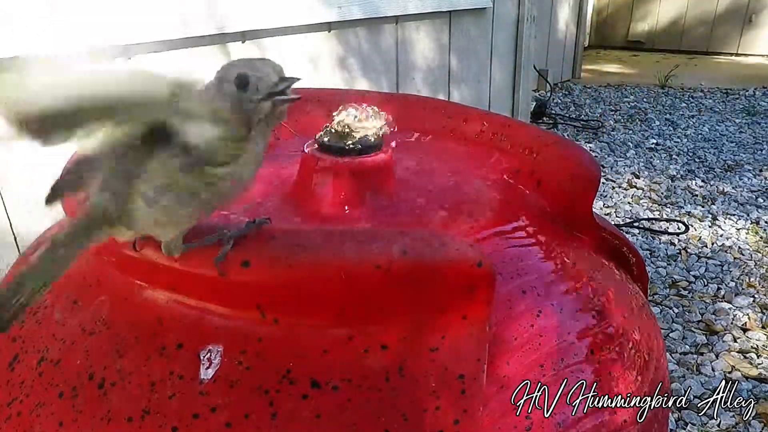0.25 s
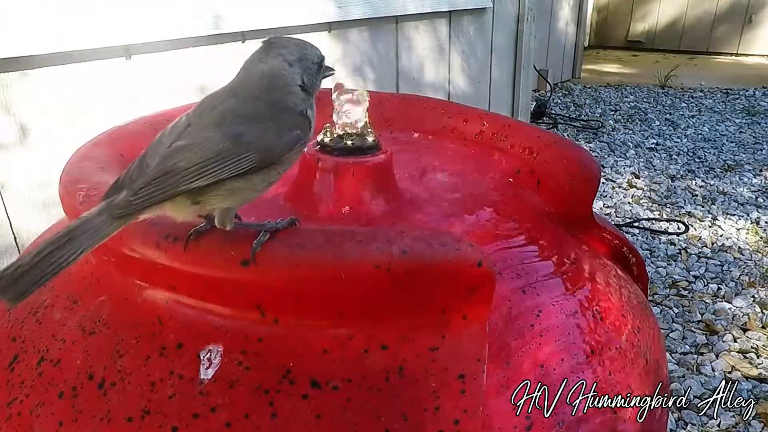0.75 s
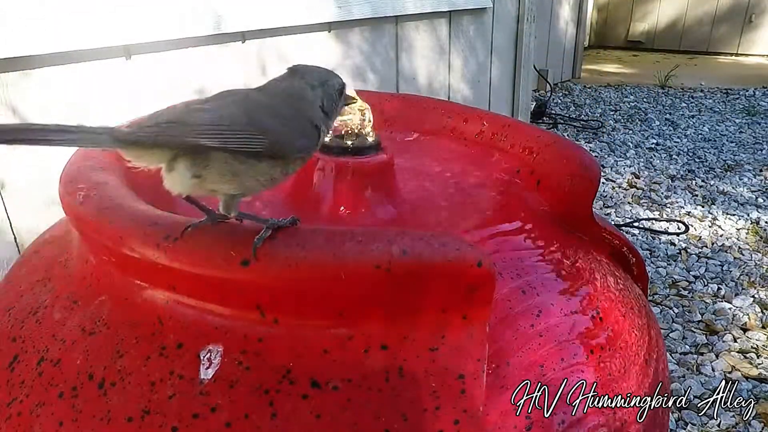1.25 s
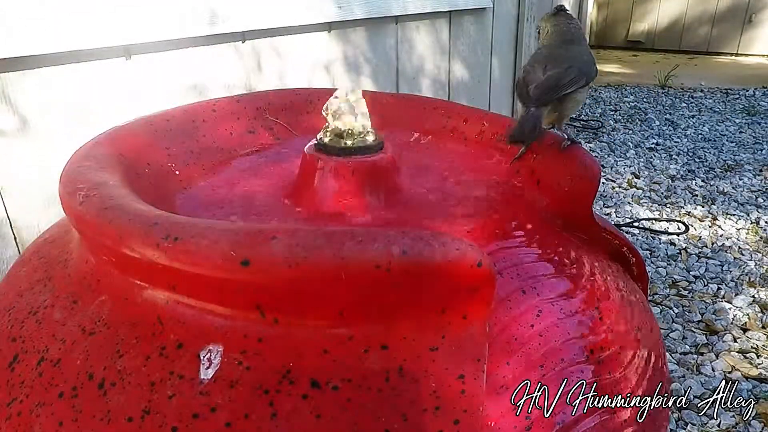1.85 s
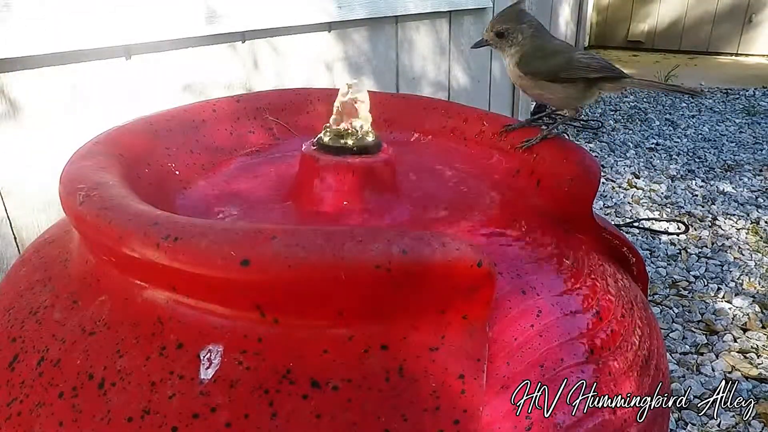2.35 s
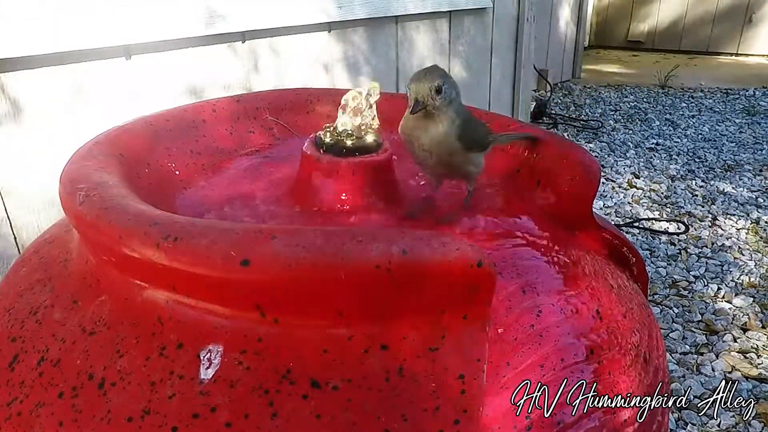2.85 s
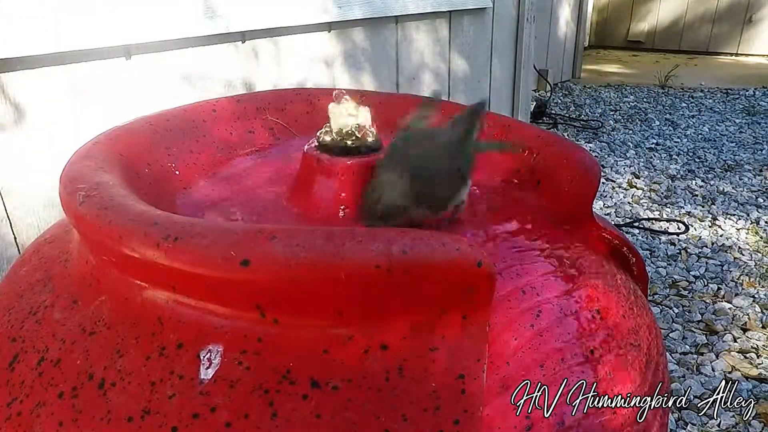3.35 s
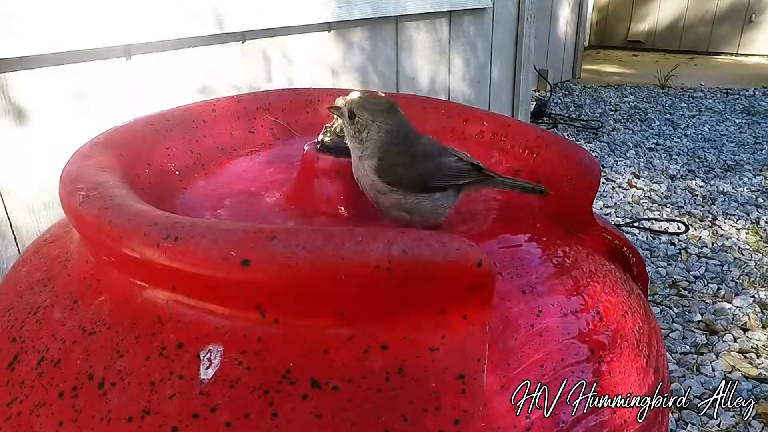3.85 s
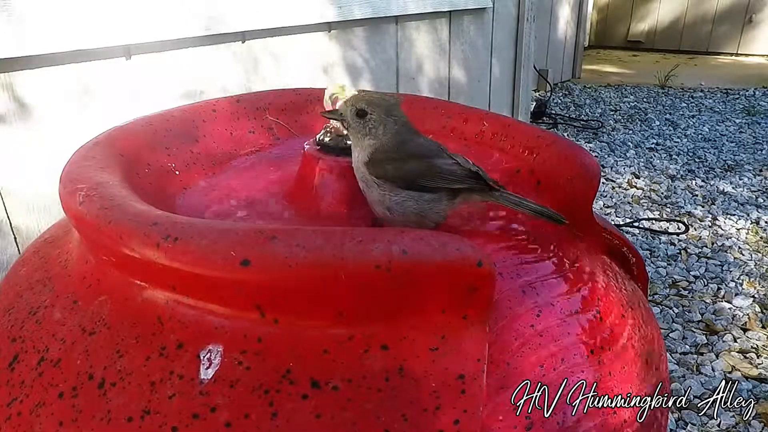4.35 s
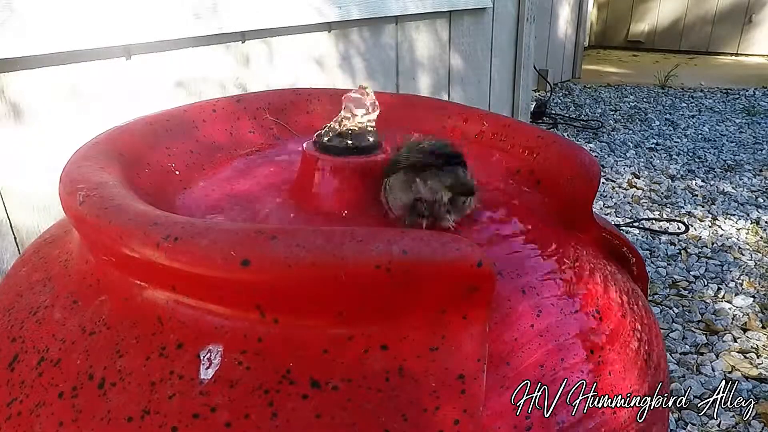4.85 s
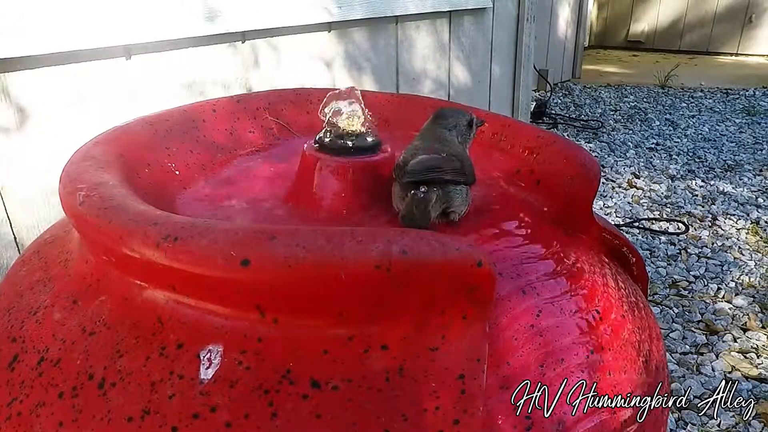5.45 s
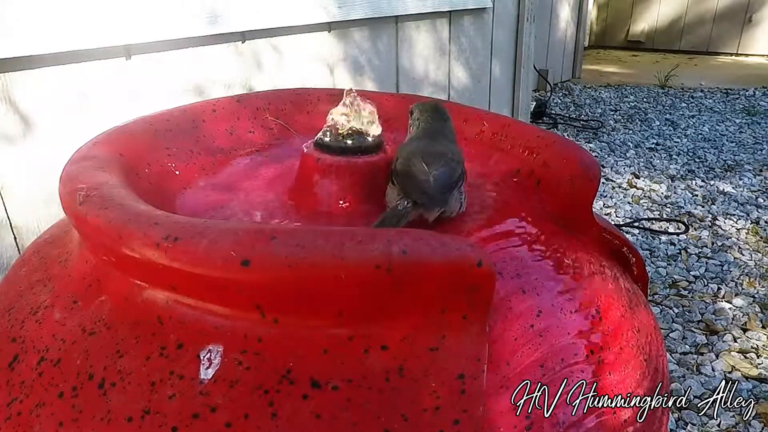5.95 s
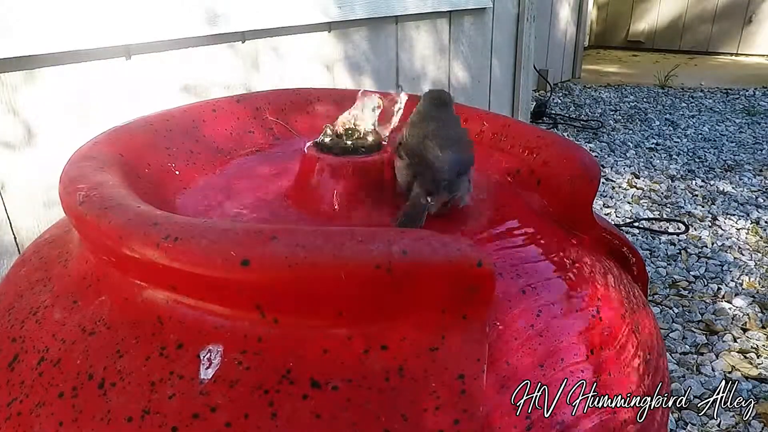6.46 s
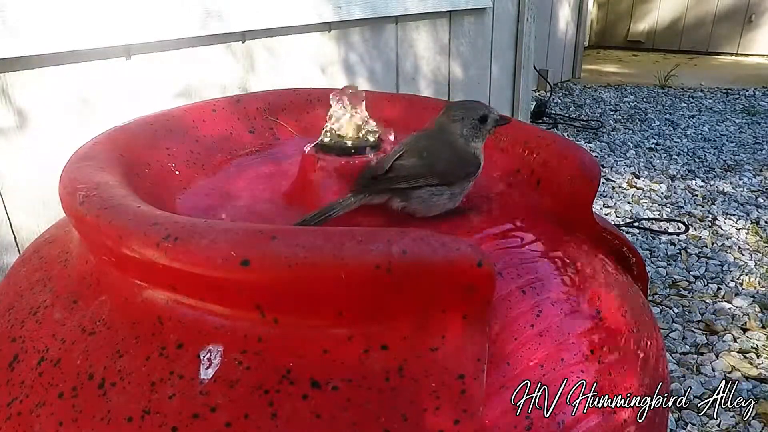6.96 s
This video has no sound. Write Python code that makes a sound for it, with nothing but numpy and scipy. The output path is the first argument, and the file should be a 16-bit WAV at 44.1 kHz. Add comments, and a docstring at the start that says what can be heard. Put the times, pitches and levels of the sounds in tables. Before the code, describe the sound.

A small pot fountain plinks and trickles close by while a little bird flutters with deep, buffeting wing thumps, taps the pot and chirps once.

```python
"""Pot fountain with small birds

Water plinks, spatters and gurgles in a basin, made of damped rings that climb in pitch and noise cracks.
Blows ring the modes of a hollow pot; close wings and wind are low turbulence and swings at the microphone.
One bird chirps with two mixing whistles, and another gives a harsh call of pulsed noise through throat resonances.
Behind them lie the hum of the pump in sine harmonics, a wash of water, the still yard and faint falling tones.
"""
import sys
import numpy as np
from scipy import signal
from scipy.fft import rfft, irfft
from scipy.io import wavfile
from scipy.ndimage import uniform_filter1d

SR = 44100
rng = np.random.default_rng(int(sys.argv[2]) if len(sys.argv) > 2 else 0)


def transcribe(signal):
    """Save signal, clipped to [-1, 1], as a 16-bit WAV file at the path in sys.argv[1]."""
    frames = np.atleast_2d(signal).T
    limited = np.clip(frames, -1, 1)
    pcm = np.round(limited * 32767).astype(np.int16)
    wavfile.write(sys.argv[1], SR, pcm)


N = 317961
T = np.arange(N) / SR

# The clearest short rings: bubbles in the basin, and the ping of the tap at 3.80 s.
# Each row: start in seconds, peak in dB, pitch in Hz, cycles until the ring is 60 dB down.
CLEAR_RINGS = [(.035, -37, 4200, 20), (.777, -44, 4000, 13), (0.7996, -43, 1950, 18),
               (.881, -37.5, 5340, 12), (1.0843, -30.5, 4260, 29), (1.113, -42, 4250, 18),
               (1.288, -46, 4500, 31), (1.286, -48, 7350, 25), (1.4364, -44.5, 2450, 29),
               (1.45, -45, 3900, 13), (1.5199, -41, 810, 16), (1.621, -51.5, 1960, 81),
               (1.7952, -48, 1177, 66), (1.7977, -40.5, 2680, 32), (1.899, -46, 2330, 49),
               (1.935, -42.5, 1067, 39), (1.94, -42, 3670, 28), (1.955, -47, 3460, 28),
               (1.974, -48, 4300, 23), (2.101, -55, 1400, 65), (2.248, -54, 2120, 49),
               (2.272, -53, 2750, 30), (2.253, -46, 2880, 33), (2.341, -50, 1060, 100),
               (2.3428, -41.5, 5600, 33), (2.471, -58, 1460, 70), (2.473, -54, 2750, 40),
               (2.601, -46.5, 3300, 56), (2.607, -46, 3740, 24), (2.626, -56, 1610, 55),
               (2.724, -43, 1990, 43), (2.731, -55, 2370, 70), (2.7527, -32, 3300, 18),
               (2.754, -50, 1670, 30), (2.848, -41, 6700, 21), (2.8632, -30, 3620, 23),
               (2.88, -49, 4300, 26), (3.0178, -42, 3400, 15), (3.039, -39, 4100, 18),
               (3.086, -44, 3900, 24), (3.1713, -30, 6000, 35), (3.175, -34, 3660, 31),
               (3.176, -47.5, 1640, 37), (3.249, -45, 7860, 34), (3.285, -43, 3730, 29),
               (3.2845, -46, 8000, 31), (3.328, -48, 2750, 26), (3.376, -46, 3600, 26),
               (3.344, -43, 2600, 21), (3.346, -45, 4420, 26), (3.3728, -38.5, 2950, 18),
               (3.393, -37.5, 2780, 24), (3.6314, -44, 5900, 40), (3.736, -48.5, 3200, 40),
               (3.801, -25, 2440, 23), (4.0042, -42.5, 1280, 35), (4.026, -35, 6530, 39),
               (4.035, -43, 6860, 34), (4.072, -54, 1820, 45), (4.1195, -47.5, 6300, 48),
               (4.191, -45, 1290, 56), (4.386, -58, 2950, 50), (4.475, -57, 2540, 55),
               (4.503, -52.5, 1220, 110), (4.5247, -44, 6000, 36), (4.529, -42.5, 2280, 38),
               (4.5536, -41, 7400, 34), (4.58, -48, 3200, 16), (4.631, -37, 4600, 27),
               (4.953, -51, 2220, 60), (5.032, -41.5, 2930, 32), (5.0646, -34, 3420, 14),
               (5.066, -48, 3330, 70), (5.179, -45, 4350, 28), (5.1855, -45, 2360, 40),
               (5.2378, -42.5, 4970, 32), (5.3012, -44, 2200, 26), (5.3084, -27.5, 2100, 18),
               (5.315, -44, 2140, 60), (5.353, -43, 2850, 43), (5.696, -51, 2300, 45),
               (5.779, -47.5, 4100, 50), (5.9085, -45, 3120, 26), (6.424, -37, 3370, 17),
               (6.4352, -30.5, 2700, 13), (6.439, -42, 2610, 60), (6.4884, -43.5, 3080, 27),
               (6.5299, -27.5, 2660, 17), (6.533, -37, 2470, 36), (6.537, -40, 3800, 28),
               (6.548, -37, 3500, 25), (6.549, -40, 4700, 39), (6.572, -36.5, 4360, 45),
               (6.599, -44, 5370, 26), (6.6424, -43.5, 4600, 32), (6.769, -46, 4200, 33),
               (6.957, -48.5, 2680, 58), (7.077, -44, 4030, 45), (7.0825, -42.5, 5800, 27)]
# Splashes in the shallow basin. Each row: start in seconds, length in seconds,
# greatest droplet peak in dB, centre of the droplet pitches in Hz.
BASIN_SPLASHES = [(1.56, 0.013, -41.5, 3080), (1.934, 0.01, -37, 6100), (2.286, 0.014, -47, 3750),
                  (3.146, 0.027, -49, 2860), (4.853, 0.003, -37, 2980), (6.503, 0.016, -44, 5060),
                  (6.526, 0.017, -43, 3260), (6.548, 0.012, -52, 4540), (6.57, 0.012, -52, 5060),
                  (6.738, 0.0086, -49, 3540)]
# The loudest drops that slap the wet glaze. Each row: start in seconds, peak in dB, centre of the colour in Hz.
GLAZE_SLAPS = [(.377, -35, 8000), (0.416, -49, 5500), (.421, -51, 4500), (.586, -45, 10000),
               (1.565, -34, 8850), (1.895, -35, 7650), (1.939, -42, 9900), (2.142, -39, 2430),
               (2.291, -41.5, 12000), (2.813, -41, 10000), (3.072, -30.5, 10900), (3.148, -33.5, 6240),
               (3.158, -43, 6500), (3.326, -41, 9900), (3.709, -48, 6000), (4.235, -37.5, 6400),
               (4.513, -36.5, 11000), (4.8546, -48, 3970), (4.999, -44, 4970), (5.811, -38, 5400),
               (6.507, -46, 4800), (6.521, -46, 11000), (6.56, -41, 12000), (6.57, -35, 12100),
               (6.581, -39, 11500), (6.588, -45, 14000), (6.956, -41, 11360)]
# Beak and claws on the pot. Each row: start in seconds, peak in dB, contact cutoff in Hz,
# ring favoured by the place struck in Hz, weight of the deep modes in dB.
POT_BLOWS = [(1.5635, -44, 2000, 630, -9), (3.147, -43, 1800, 650, -1), (3.393, -25.5, 1400, 966, 6.5),
             (3.8007, -24, 4860, 1044, -11), (4.003, -42, 3130, 1440, -4), (4.188, -51, 2000, 2000, -4),
             (4.912, -38.5, 474, 380, 2), (5.6252, -24.5, 1980, 1490, 2), (6.88, -44, 580, 556, 2),
             (7.03, -36.5, 734, 656, 15), (7.069, -42.5, 695, 566, -1)]
# Modes of the pot. Each row: frequency in Hz, relative level in dB, time to fall 60 dB in seconds.
POT_MODES = [(140, -10.5, 0.15), (324, 0, 0.038), (402, -0.5, 0.03), (562, -1, 0.029), (640, -1, 0.07),
             (756, 3.5, 0.027), (902, 0.5, 0.042), (974, -12, .15), (1042, -9.5, 0.092), (1217, 6.5, 0.027),
             (1468, -12, 0.089), (1518, -11.5, .125), (1650, 4.5, 0.016), (1990, -6.5, 0.039),
             (2270, -13, .09), (2530, 7, 0.0049), (3400, 9.5, 0.012), (4760, 18.5, 0.0035)]
# Bursts of wingbeats. Each row: start in seconds, end in seconds, beats per second,
# feather swish in dB, reference level of the pushed air in dB.
WINGBEAT_BURSTS = [(-.02, 0.27, 26.5, -47, -20), (0.273, 0.482, 23.3, -48.5, -18.5),
                   (0.419, 0.599, 25.4, -48, -31.5), (0.664, 0.792, 24.4, -52, -28),
                   (0.852, 0.935, 25.6, -52, -26.5), (6.264, 6.481, 28.2, -49, -28),
                   (6.489, 6.651, 25.3, -48, -28), (6.684, 6.772, 31.6, -45, -34),
                   (6.828, 6.93, 26.8, -54, -32), (6.994, 7.095, 25.3, -51.5, -35)]
# Short feathery bursts of noise: hard wing strokes, and one splash near 6.51 s.
# Each row: peak time in seconds, half length in seconds, feathery noise in dB, low puff in dB.
FEATHERY_BURSTS = [(0.061, 0.0049, -58, -40), (0.103, 0.0066, -50, -48), (0.14, 0.0098, -70, -36.5),
                   (0.149, 0.0021, -58, -44), (0.173, 0.0065, -69, -40.5), (0.207, 0.0098, -59, -58),
                   (.24, 0.012, -51, -61), (0.286, 0.0053, -49, -50), (0.31, 0.013, -49.5, -39),
                   (0.324, .003, -53, -22), (0.335, 0.0061, -47, -10.5), (0.348, 0.0067, -46, -9.5),
                   (0.378, 0.015, -49, -23), (0.417, 0.0072, -43.5, -35), (0.456, 0.0055, -55, -29),
                   (0.495, 0.0043, -66, -31), (0.534, 0.0057, -49, -35), (0.57, 0.0061, -67, -42),
                   (0.721, 0.0095, -58, -40.5), (0.887, 0.0092, -55.5, -43), (0.971, 0.0067, -48, -46),
                   (6.278, 0.0035, -53, -52), (6.31, 0.014, -53, -44), (6.345, 0.0075, -53.5, -41),
                   (6.511, 0.0059, -52.5, -62), (6.564, 0.0067, -50, -38), (6.602, 0.0065, -51.5, -41.5),
                   (6.741, 0.0023, -44, -41), (6.88, 0.007, -57, -38.5), (7.07, 0.0039, -52, -40.5)]
# Spectra of noise: feather swish, feathery bursts, wing wake, turbulent air, wash of water.
# Each row: frequency in Hz, relative level in dB.
SWISH_SPECTRUM = [(100, 32.5), (300, 9.5), (600, 8), (1200, 4.5), (2500, 2), (5000, -4), (8000, -11),
                  (15000, -12.5)]
BURST_SPECTRUM = [(400, 16), (1200, 8), (2500, 1.5), (5000, 0), (8000, -6), (15000, -9)]
WAKE_SPECTRUM = [(70, 0.5), (120, 8), (230, 2.5), (310, 1), (460, -12), (650, -12.5), (1300, -40.5),
                 (2300, -88)]
AIR_SPECTRUM = [(15, -8), (29, 4), (50, -2), (75, -8.5), (105, -15), (200, -34), (400, -57), (900, -70)]
WASH_SPECTRUM = [(300, 7.5), (900, -0.5), (2500, -7), (4800, -7.5), (8000, -15), (15000, -17)]
# A chirp from both sides of the syrinx. Each row: time in seconds, low voice in Hz, high voice in Hz,
# low voice in dB, high voice in dB.
CHIRP_COURSE = [(6.362, 4800, 6400, -75, -90), (6.371, 4540, 6020, -45.5, -43.5),
                (6.382, 4450, 5820, -44, -47), (6.388, 4480, 5700, -73, -72), (6.394, 4500, 5650, -46, -65),
                (6.412, 4340, 5700, -49, -52), (6.428, 4250, 5350, -47, -54), (6.444, 4100, 5040, -48, -52),
                (6.452, 4050, 4900, -82, -91)]
# Overtones of the chirp. Each row: multiple of the low voice, multiple of the high voice.
CHIRP_OVERTONES = [(2, 0), (-1, 2), (1, 1), (0, 2), (3, 0)]
# Level of each overtone in dB against the low voice.
CHIRP_OVERTONE_DB = [-24, -30, -27, -30, -28]
# Course of the harsh call. Each row: time in seconds, level in dB.
RASP_COURSE = [(.99, -85), (.999, -49), (1.014, -59), (1.037, -54.5), (1.047, -61), (1.075, -68),
               (1.105, -60.5), (1.15, -67), (1.165, -59), (1.205, -85), (1.235, -68), (1.26, -57.5),
               (1.3, -77)]
# Throat resonances of that call. Each row: frequency in Hz, width in Hz, relative level in dB.
THROAT_RESONANCES = [(1540, 370, 2), (2450, 400, 0), (3700, 440, -12)]
# Thumps of moving air on the microphone, from close wings or wind. Each row: peak time in seconds,
# half length in seconds, reference level in dB.
AIR_THUMPS = [(0.13, 0.02, -16), (0.347, 0.042, -6), (0.685, 0.016, -24), (0.75, 0.017, -25),
              (0.879, 0.016, -21.5), (0.981, 0.017, -16.5), (1.053, 0.024, -27), (1.216, 0.09, -30.5),
              (1.606, 0.039, -37.5), (2.737, 0.33, -41), (3.409, 0.059, -27.5), (3.578, 0.067, -39.5),
              (3.77, 0.047, -39), (4.378, 0.047, -35), (4.47, 0.027, -26), (4.75, 0.04, -31),
              (5.007, 0.042, -30), (5.3, 0.15, -39), (5.507, 0.032, -34), (5.741, 0.026, -33),
              (5.932, 0.061, -33), (6.06, 0.052, -29.5), (6.29, 0.014, -26.5), (6.326, 0.048, -21),
              (6.75, 0.03, -25)]
# Faint thin tones. Each row: middle in seconds, half length in seconds, pitch at the middle in Hz,
# glide in Hz per second, rms at the middle in dB.
THIN_TONES = [(4.641, 0.078, 534, -650, -64), (5.563, 0.032, 600, -250, -62.5),
              (5.742, .1, 928, -180, -69.5)]
# Hum of the pump. Each row: frequency in Hz, mean rms in dB.
PUMP_HARMONICS = [(120, -59), (240, -68.5), (360, -73.5)]
# Spectrum of the still yard. Each row: frequency in Hz, relative level in dB per Hz.
YARD_SPECTRUM = [(40, 30), (90, 17.5), (150, 24), (220, 20.5), (340, 19), (520, 11), (800, 7), (1400, -0.5),
                 (3000, -5), (6000, -8), (10000, -13.5), (15500, -24)]


def undb(db):
    """Decibels are a logarithmic measure: convert them to amplitude gain."""
    return 10 ** (np.asarray(db) / 20)


def unit(x):
    """Normalise the power: scale to rms 1."""
    return x / np.sqrt(np.mean(x ** 2))


def curves(table):
    """Linear interpolation: join each column of a table by straight lines in time."""
    s, *columns = np.transpose(table)
    return [np.interp(T, s, c) for c in columns]


def noise(spectrum):
    """Spectral shaping: weight white noise by (Hz, dB) points and scale it to rms 1."""
    hz, db = np.transpose(spectrum)
    f = np.maximum(np.fft.rfftfreq(N, 1 / SR), 1)
    gain = undb(np.interp(np.log(f), np.log(hz), db))
    # beyond the outer points the level falls by 12 dB per octave
    gain = gain * np.minimum(f / hz[0], 1) ** 2 * np.minimum(hz[-1] / f, 1) ** 2
    return unit(irfft(rfft(rng.standard_normal(N)) * gain, N))


def band(x, hz, width):
    """Simple resonance: a second-order peak with gain 1 at its centre."""
    centre_hz = min(hz, SR / 2 - 2000)
    b, a = signal.iirpeak(centre_hz, hz / min(width, SR / 3), fs=SR)
    return signal.lfilter(b, a, x)


def walk(rate):
    """Slow random fluctuation: smoothed random steps, scaled to rms 1."""
    k = max(int(SR / rate), 1)
    steps = np.repeat(rng.standard_normal(N // k + 1), k)[:N]
    return unit(uniform_filter1d(steps, k))


def swell(s, length):
    """Gaussian envelope: a bell-shaped rise and fall about time s."""
    return np.exp(-np.minimum(((T - s) / length) ** 2, 20))


def add(out, s, sound):
    """Superposition: mix a sound in at time s."""
    i = int(np.clip(s * SR, 0, N - 1))
    out[i:i + len(sound)] += sound[:N - i]


def bubble(hz, t60, rise_per_cycle=0.0076, birth_share=0.0097):
    """Damped bubble oscillation: it rings once and climbs in pitch as it nears the surface."""
    t = T[:SR // 10]
    cycles = hz * t
    birth = 1 - np.exp(-t / (birth_share * t60))
    phase = 2 * np.pi * (cycles + rise_per_cycle * cycles ** 2 / 2)
    ring = np.gradient(np.sin(phase) * undb(-60 * t / t60) * birth)
    return ring / np.abs(ring).max()


def plinks(after_db=-17, after_t60=0.0053, tick_db=-15, tick_t60=0.011,
           lead_s=0.001203, rise=.006, rise_slope=0.34):
    """Impact and damped ringing: a tick, a clear ring (a bubble, or once the pot tap's ping), a weaker ring."""
    out, t = np.zeros(N), T[:SR // 50]
    chances = rng.random((len(CLEAR_RINGS), 2))
    for (s, db, hz, cycles), (lag, size) in zip(CLEAR_RINGS, chances):
        grit = rng.standard_normal(len(t)) * undb(-60 * t / tick_t60)
        tick = band(grit, 1.4 * hz, 1.4 * hz)
        add(out, s - lead_s, undb(db + tick_db) * tick / np.abs(tick).max())
        # the louder the ring, the steadier its pitch
        rise_per_cycle = rise * undb(-rise_slope * (db + 46))
        add(out, s, undb(db) * bubble(hz, cycles / hz, rise_per_cycle))
        after = bubble(hz * (0.86 + 0.19 * size), after_t60)
        add(out, s + 0.002 + 0.0065 * lag, undb(db + after_db) * after)
    return out


def burble(count=70, db=-51, spread_db=7, low_hz=2400, high_hz=8500, cycles=20):
    """Repeated bubble resonance: softer, short bubbles keep surfacing, about ten each second."""
    out = np.zeros(N)
    for k, (when, pitch, depth) in enumerate(rng.random((count, 3))):
        hz = low_hz * (high_hz / low_hz) ** pitch
        start = (k + when) / count * N / SR
        add(out, start, undb(db - spread_db * depth) * bubble(hz, cycles / hz))
    return out


def trickle(count=800, db=-63, spread_db=3.5, low_hz=2000, high_hz=12000, cycles=26):
    """Random superposition: many tiny bubbles where the jet falls back, few of them loud."""
    out = np.zeros(N)
    for when, pitch, size, life in rng.random((count, 4)):
        hz = low_hz * (high_hz / low_hz) ** pitch
        level_db = db - spread_db * np.log(size + 0.017)
        add(out, when * N / SR, undb(level_db) * bubble(hz, cycles * (.5 + life) / hz))
    return out


def splashes(count=8, octaves=1.71, cycles=17, spread_db=6):
    """Break-up into droplets: a splash throws a handful, each with a brief ring of its own."""
    out = np.zeros(N)
    chances = rng.random((len(BASIN_SPLASHES), count, 3))
    for (s, length, db, centre), droplets in zip(BASIN_SPLASHES, chances):
        for when, pitch, size in droplets:
            hz = centre * 2 ** (octaves * (pitch - .5))
            add(out, s + length * when, undb(db - spread_db * size) * bubble(hz, cycles / hz))
    return out


def spats(t60=0.0034, spray_db=-21, spray_t60=0.021):
    """Impact noise: a drop slaps the glaze with a sharp crack and a little longer-lasting spray."""
    out, t = np.zeros(N), T[:SR // 25]
    decay = undb(-60 * t / t60) + undb(spray_db - 60 * t / spray_t60)
    for s, db, hz in GLAZE_SLAPS:
        crack = band(rng.standard_normal(len(t)) * decay, hz, 0.8 * hz)
        add(out, s, undb(db) * crack / np.abs(crack).max())
    return out


def gurgle(count=60, db=-60, spread_db=8, low_hz=300, high_hz=1000, cycles=36):
    """Size and pitch: large, slow bubbles glug faintly at low pitch where the water drains."""
    out = np.zeros(N)
    for when, pitch, depth in rng.random((count, 3)):
        hz = low_hz * (high_hz / low_hz) ** pitch
        add(out, when * N / SR, undb(db - spread_db * depth) * bubble(hz, cycles / hz, 0.0038))
    return out


def hollow_boom(hz=141.2, width_hz=20.4, db=-60):
    """Cavity resonance: the air in the pot booms softly, as noise through two equal resonances."""
    once = band(rng.standard_normal(N), hz, width_hz)
    return undb(db) * unit(band(once, hz, width_hz))


def taps(rattle_db=-8, rattle_t60=0.029, favour_db=9, favour_width_hz=40, deep_hz=600):
    """Modal excitation: the place struck weights the pot's modes, and a soft contact dulls the high ones."""
    out, t = np.zeros(N), T[:SR // 5]
    # neighbouring modes of the wall push the air in opposite directions
    modes = np.array([(-1) ** k * undb(db - 60 * t / t60) * np.sin(2 * np.pi * hz * t)
                      for k, (hz, db, t60) in enumerate(POT_MODES)])
    mode_hz = np.array(POT_MODES)[:, 0]
    for s, db, contact_hz, favoured_hz, deep_db in POT_BLOWS:
        favour = np.exp(-((mode_hz - favoured_hz) / favour_width_hz) ** 2)
        mix_db = favour_db * favour + deep_db * (mode_hz < deep_hz)
        rattle = rng.standard_normal(len(t)) * undb(rattle_db - 60 * t / rattle_t60)
        contact = signal.butter(3, contact_hz, fs=SR, output="sos")
        blow = signal.sosfilt(contact, undb(mix_db) @ modes + rattle)
        add(out, s, undb(db) * blow / np.abs(blow).max())
    return out


def eddies():
    """Turbulent pressure: low noise at the microphone, evened out in strength."""
    air = noise(AIR_SPECTRUM)
    return air / np.sqrt(uniform_filter1d(air ** 2, SR // 16))


def wings(beat_db=-2, eddy_db=-5, swish_depth=0.33, wake_db=-21, sharpness=3, surge_db=2.0, linger_s=0.019):
    """Periodic forcing: each beat pushes air, swishes feathers and sheds a puff; stirred air settles slowly."""
    push, swish, stir, wake = np.zeros((4, N))
    for start, end, rate, feather_db, air_db in WINGBEAT_BURSTS:
        progress = np.clip((T - start) / (end - start), 0, 1)
        # some beats are harder than others
        window = undb(surge_db * walk(rate)) * np.sqrt(np.sin(np.pi * progress).clip(0))
        turn = 2 * np.pi * rate * (T - start) + 0.92 * walk(25)
        air = window * undb(air_db)
        push += air * (np.sin(turn) + 0.46 * np.sin(2 * turn))
        stir += air
        wake += air * np.exp(sharpness * (np.cos(turn) - 1))
        swish += window * undb(feather_db) * (1 + swish_depth * np.cos(turn))
    keep = np.exp(-1 / (linger_s * SR))
    stir = signal.lfilter([1 - keep], [1, -keep], stir)
    buffet = undb(beat_db) * np.sqrt(2) * push
    buffet += undb(eddy_db) * stir * eddies()
    buffet += undb(wake_db) * wake * noise(WAKE_SPECTRUM)
    return buffet + swish * undb(2 * walk(250)) * noise(SWISH_SPECTRUM)


def feathery_bursts(rustle_db=2.0):
    """Shaped noise: hard wing strokes, and one splash, give a rustling burst with a low puff beneath."""
    rustle, puff = np.zeros((2, N))
    for s, length, rustling_db, puff_db in FEATHERY_BURSTS:
        burst = swell(s, length)
        rustle += undb(rustling_db) * burst
        puff += undb(puff_db) * burst
    grain = undb(rustle_db * walk(400)) * noise(BURST_SPECTRUM)
    return rustle * grain + puff * noise(WAKE_SPECTRUM)


def chirp():
    """Combination tones: two whistles fall together and mix in the throat into a stack of overtones."""
    low_hz, high_hz, low_db, high_db = curves(CHIRP_COURSE)
    low, high = (2 * np.pi * np.cumsum(hz * (1 + 0.0033 * walk(400))) / SR for hz in (low_hz, high_hz))
    stack = sum(undb(db) * np.sin(a * low + b * high)
                for (a, b), db in zip(CHIRP_OVERTONES, CHIRP_OVERTONE_DB))
    voices = undb(low_db) * (np.sin(low) + stack) + undb(high_db) * np.sin(high)
    return voices * (T > CHIRP_COURSE[0][0]) * (T < CHIRP_COURSE[-1][0])


def rasp(pulse_hz=65, depth=0.36, waver_db=1.0):
    """Source and filter: pulsed hoarse noise passes three throat resonances that waver in strength."""
    db, = curves(RASP_COURSE)
    pulses = 1 + depth * np.sin(2 * np.pi * pulse_hz * T + walk(29.1))
    source = rng.standard_normal(N) * pulses
    throat = sum(undb(g + waver_db * walk(35.05)) * band(band(source, hz, w), hz, w)
                 for hz, w, g in THROAT_RESONANCES)
    return undb(db) * unit(throat) * (T > RASP_COURSE[0][0]) * (T < RASP_COURSE[-1][0])


def echoes(x, db=-15, t60=0.12):
    """Diffuse reflection: scattered returns from fence and gravel, dull in the treble."""
    t = T[:SR // 2]
    tail = band(rng.standard_normal(len(t)), 1300, 12000) * undb(-60 * t / t60) * (t > .004)
    return undb(db) * signal.fftconvolve(x, tail / np.sqrt(np.sum(tail ** 2)))[:N]


def air_buffets(breeze_db=-50, rise_db_per_s=0.62, waver_db=1.5,
                roll_hz=32.07, roll_db=-3, eddy_db=-4, wander=1.0):
    """Air pressure: a slowly freshening breeze, and thumps from close wings or wind, buffet the microphone."""
    breeze = undb(breeze_db + rise_db_per_s * T + waver_db * walk(13))
    thumps = np.sqrt(sum((undb(db) * swell(s, length)) ** 2 for s, length, db in AIR_THUMPS))
    # each thump carries a train of deep pressure swings
    roll = np.sqrt(2) * np.sin(2 * np.pi * roll_hz * T + wander * walk(30))
    return np.hypot(breeze, undb(eddy_db) * thumps) * eddies() + undb(roll_db) * thumps * roll


def faint_tones():
    """Frequency glide: soft, slightly falling sine tones swell and fade."""
    out = np.zeros(N)
    for s, length, hz, glide, db in THIN_TONES:
        pitch = hz * (1 + 0.0081 * walk(40)) + glide * (T - s)
        tone = np.sin(2 * np.pi * np.cumsum(pitch) / SR)
        out += np.sqrt(2) * undb(db) * swell(s, length) * tone
    return out


def pump_hum():
    """Harmonic series: the pump's mains hum, its partials wavering in level and phase."""
    return sum(np.sqrt(2) * undb(db + walk(9.9)) * np.sin(2 * np.pi * hz * T + 0.7 * walk(3.3))
               for hz, db in PUMP_HARMONICS)


def wash(db=-63):
    """Flow noise: the soft, wavering wash of water down the pot."""
    return undb(db + 0.15 * walk(25) + 1.54 * walk(70)) * noise(WASH_SPECTRUM)


def yard(db=-58.5):
    """Ambient noise: the still yard, nearly steady in level."""
    return undb(db + 0.15 * walk(6.1)) * noise(YARD_SPECTRUM)


def scene():
    """Superposition: water, pot and bird voices are echoed by the yard; the other layers are not."""
    water = plinks() + burble() + trickle() + splashes() + spats() + gurgle()
    echoed = water + hollow_boom() + taps() + chirp() + rasp()
    unechoed = wings() + feathery_bursts() + air_buffets()
    background = faint_tones() + pump_hum() + wash() + yard()
    return (echoed + echoes(echoed) + unechoed + background)[None]


def record(dry, top_hz=15500):
    """Saturation and band limit: large pressure peaks are rounded and the top is cut steeply."""
    rounded = .95 * np.tanh(dry / .95)
    return signal.sosfilt(signal.ellip(8, .2, 70, top_hz, fs=SR, output="sos"), rounded)


dry = scene()
out = record(dry)
transcribe(out)
```